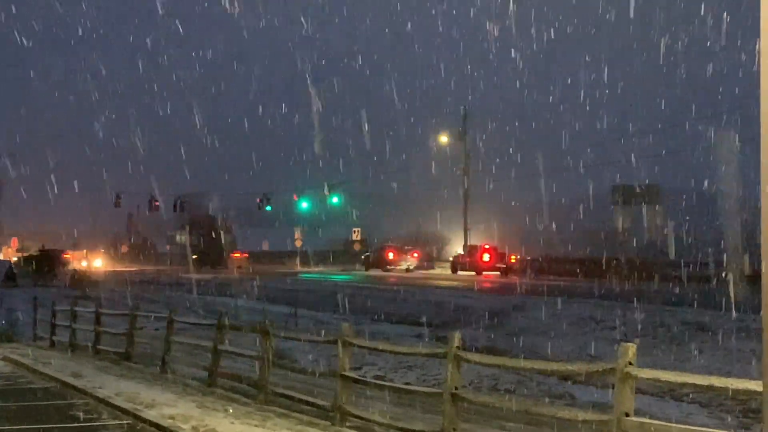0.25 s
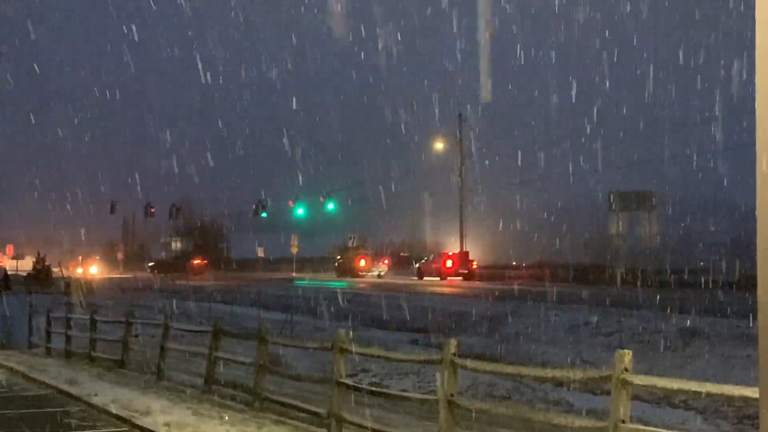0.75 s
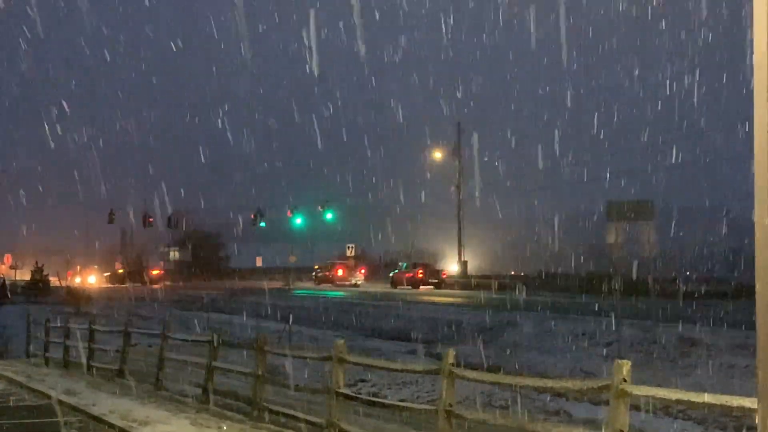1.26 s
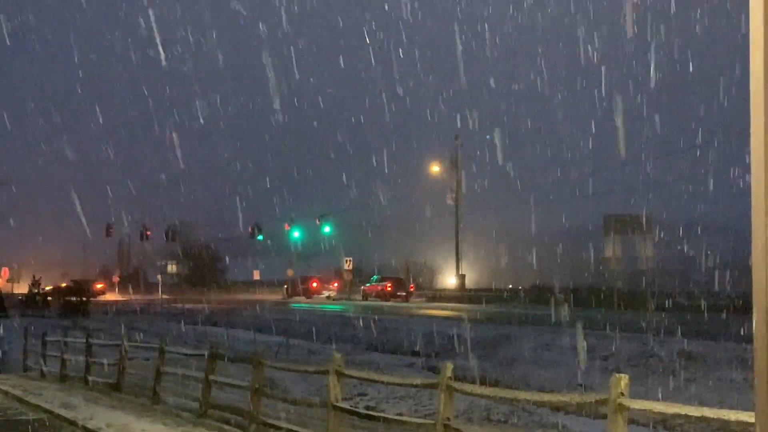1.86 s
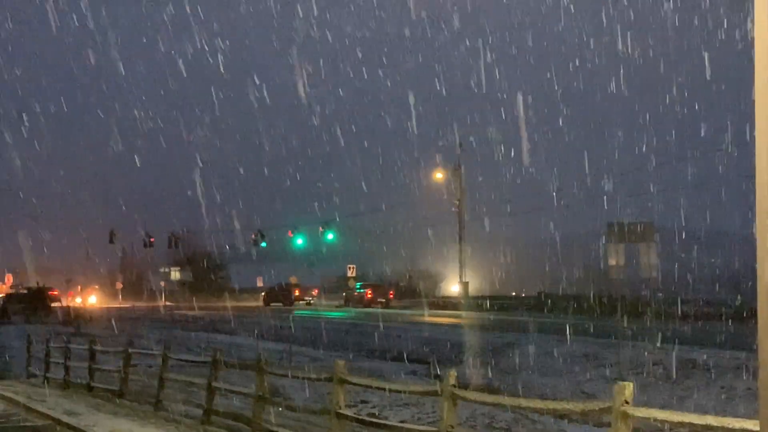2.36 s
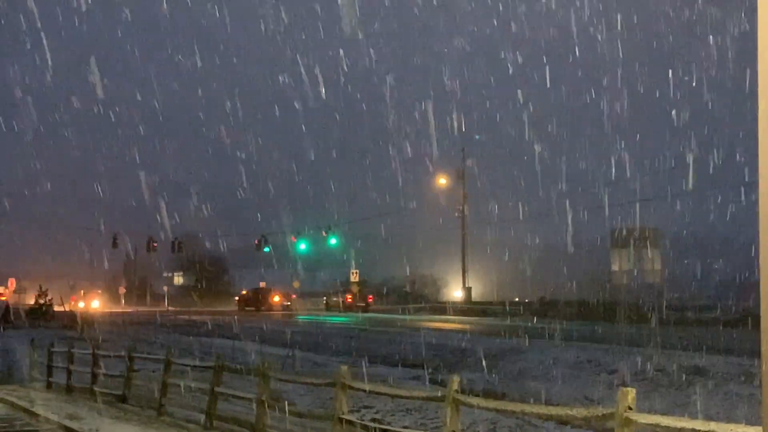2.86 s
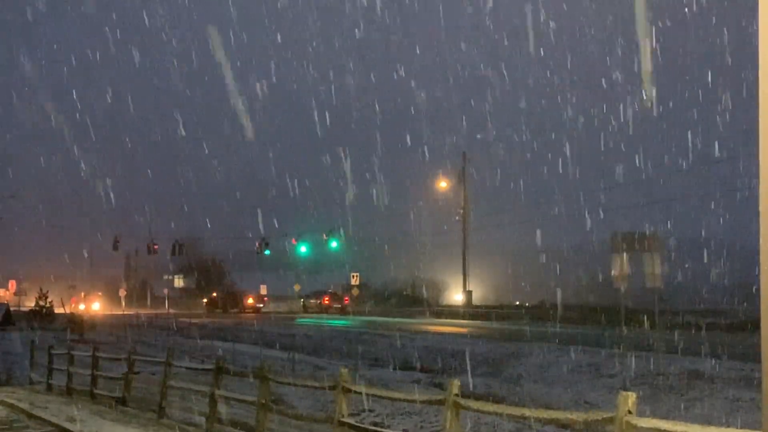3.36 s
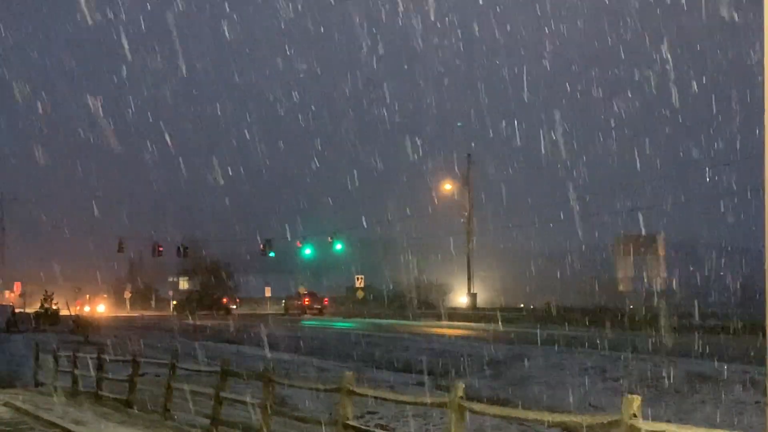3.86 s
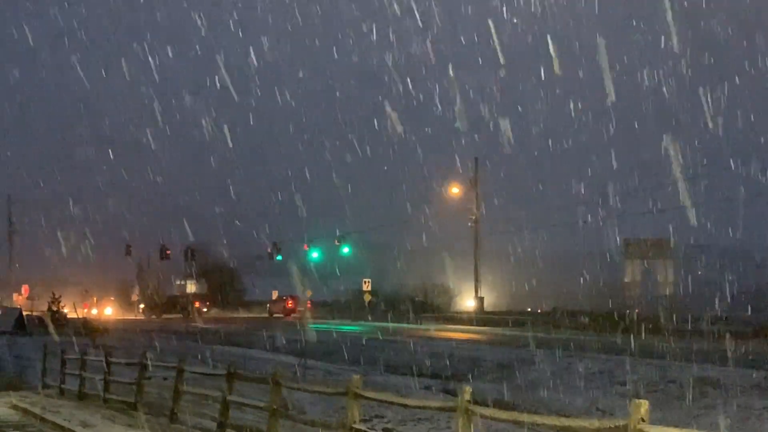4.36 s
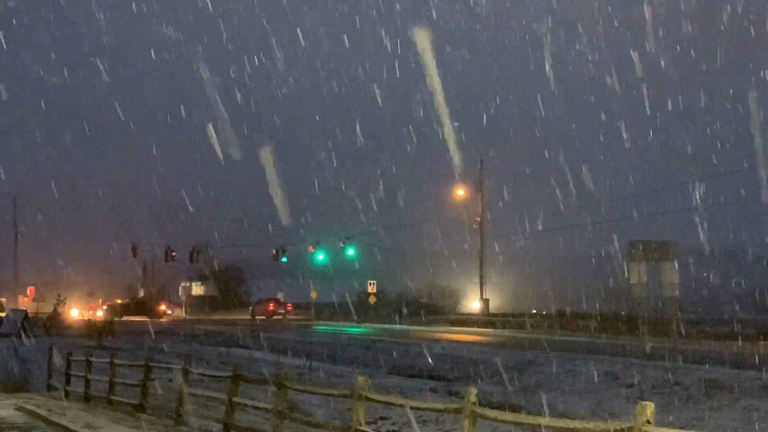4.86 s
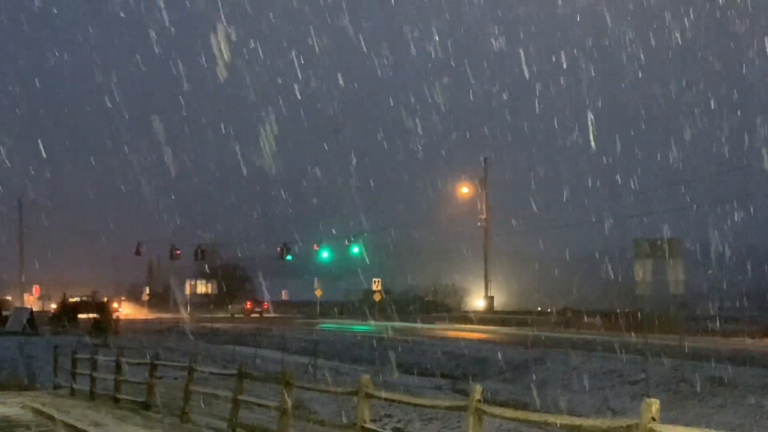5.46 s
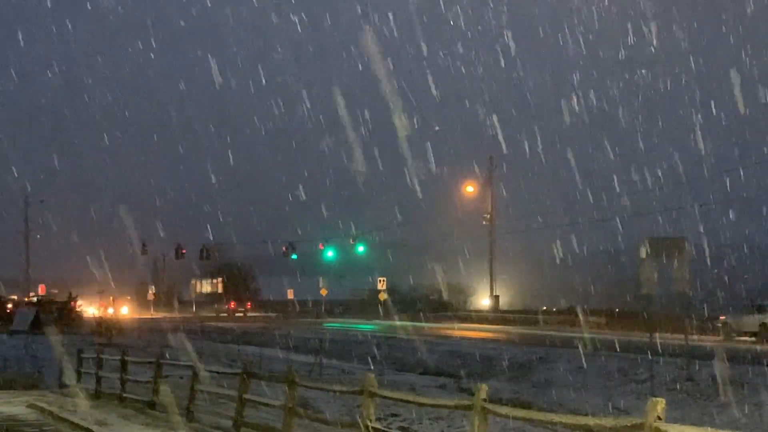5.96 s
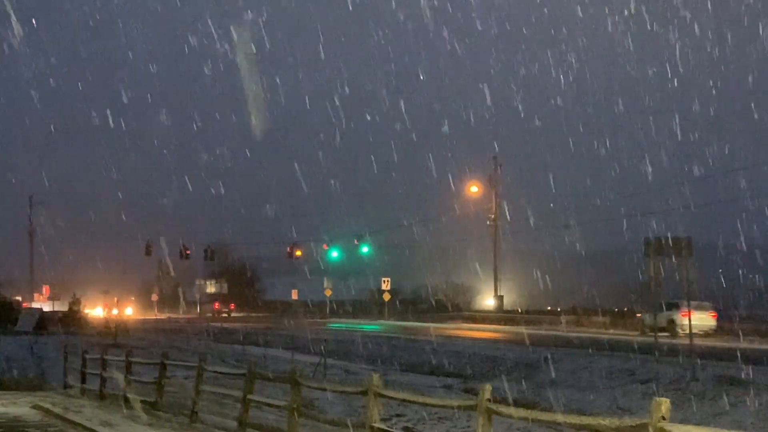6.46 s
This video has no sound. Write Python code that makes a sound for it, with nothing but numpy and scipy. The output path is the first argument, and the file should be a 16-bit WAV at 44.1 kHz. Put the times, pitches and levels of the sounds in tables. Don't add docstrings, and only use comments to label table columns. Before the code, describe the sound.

Outdoors in snowfall, a heavy truck engine drones closer over wet tyre hiss, a plow blade scrapes grittily, then a nearer vehicle swishes past.

```python
import sys
import numpy as np
from scipy import signal
from scipy.fft import rfft, irfft, next_fast_len
from scipy.io import wavfile
from scipy.ndimage import uniform_filter1d

SR = 44100
rng = np.random.default_rng(int(sys.argv[2]) if len(sys.argv) > 2 else 0)


def dump(signal):
    limited = np.clip(np.atleast_2d(signal).T, -1, 1)
    pcm = np.round(limited * 32767).astype(np.int16)
    wavfile.write(sys.argv[1], SR, pcm)


def elevation(decibels):
    levels = np.asarray(decibels, float)
    return 10 ** (levels / 20)


N = 295911
T = np.arange(N) / SR


# time in seconds, pitch of the 13th half-order in Hz, nearness in dB.
ENGINE_RUN = [(0.0, 134.6, -40), (0.5, 133.6, -41.5), (0.8, 132, -38), (1.15, 134, -40.5),
              (1.6, 135.6, -33), (2.1, 137.4, -33), (2.6, 138.6, -33.5), (3.1, 139.8, -32),
              (3.6, 140.3, -30), (4.2, 142.4, -28), (4.6, 141, -27.5), (5.2, 141.1, -27),
              (5.7, 140.5, -28.5), (6.3, 139.2, -30), (6.71, 138, -36.5)]
# half-order number, level in dB.
HALF_ORDERS = [(1, -44), (2, -42), (3, -33), (4, -9), (5, -3), (6, -27.5), (7, -16), (8, -3.5), (9, -13),
               (10, -15), (11, -14), (12, -19.5), (13, 7), (14, -13), (15, -15.5), (16, -6), (17, -9),
               (18, -14), (19, -29), (20, -13.5), (21, -11), (22, -16.5), (23, -24), (24, -34), (25, -24),
               (26, -26.5), (27, -34), (28, -26), (29, -29), (30, -23.5)]
ECHO_ORDERS = [5, 8, 13, 16, 21]
# centre in seconds, lift in dB,
# half-length in seconds.
LOW_ECHOES = [
    [(0.0, 17, 0.074), (1.3, -2, 0.18), (1.85, -7, 0.17), (2.9, -11.5, 0.14), (3.9, 1, 0.44),
     (4.36, -7.5, .08), (4.8, 3, 0.13), (5.54, 1, 0.04), (5.9, -3, 0.24)],
    [(0.3, 12, 0.25), (1.34, 6, .07), (1.51, -12, 0.042), (1.76, 9.5, .15), (2.33, 11, 0.14),
     (2.68, 9.5, .08), (3.02, 8, 0.059), (3.38, 2, 0.11), (5.2, 5, 0.059), (5.68, 8.5, 0.6),
     (6.71, 9, 0.16)],
]
# centre in seconds, lift in dB, half-length in seconds.
HIGH_ECHOES = [
    [(0.05, -5, .2), (1.01, -7, 0.19), (1.6, -4, 0.22), (2.05, -18, 0.076), (2.52, -5.5, 0.074),
     (4.1, -4.5, 0.44), (5.0, -6.5, 0.65), (5.95, -16.5, .3), (6.2, -13.5, 0.076), (6.62, -20, 0.16)],
    [(0.84, 7.5, 0.065), (1.4, 3, .15), (2.95, 5.5, 0.32), (4.15, 1.5, 0.16), (5.2, 5.5, 0.37),
     (6.35, 6, 0.077)],
    [(3.0, -2, 0.72), (3.9, 3, 0.4), (4.75, -3, 0.11), (5.1, 2.5, 0.33), (5.95, 3, 0.17), (6.6, -3, 0.26)],
]


def engine(wobble_db=4.0, wander_rad=0.17, nearing=1.55):
    s, hz, near_db = np.transpose(ENGINE_RUN)
    turn = 2 * np.pi * np.cumsum(np.interp(T, s, hz)) / 13 / SR
    coarse = T[::256]
    nearness = np.interp(coarse, s, near_db)
    swing = np.array([nearness + swells(echoes, coarse) for echoes in LOW_ECHOES + HIGH_ECHOES])
    out = np.zeros(N)
    for order, order_db in HALF_ORDERS[3:]:
        place = np.interp(order, ECHO_ORDERS, np.arange(5))
        level = sum(np.maximum(1 - abs(place - k), 0) * row for k, row in enumerate(swing))
        if order > 16:
            level += (nearing - 1) * (level - level.max())
        level += order_db
        if order not in ECHO_ORDERS:
            level += wobble_db * drift(len(coarse), 30)
        phase = rng.uniform(0, 2 * np.pi) + wander_rad * drift(len(coarse), 20)
        out += np.interp(T, coarse, elevation(level)) * np.sin(order * turn + np.interp(T, coarse, phase))
    return np.sqrt(2) * out


# time in seconds, pitch in Hz.
INTAKE_PITCH = [(0, 240), (1.5, 262.4), (2.6, 285), (3.4, 366.6), (4.8, 371), (5.3, 415.5), (6.71, 420)]
NEAR_REF_DB = -32


def intake(level_db=-50.5, follows=0.57):
    s, _, near_db = np.transpose(ENGINE_RUN)
    turn = 2 * np.pi * np.cumsum(np.interp(T, *np.transpose(INTAKE_PITCH))) / SR
    along, across = drift((2, N), 700)
    gain = elevation(level_db + follows * (np.interp(T, s, near_db) - NEAR_REF_DB))
    return gain * (along * np.sin(turn) + across * np.cos(turn))


# time in seconds, level in dB, brightness in dB.
BLADE = [
    (1.6, -44, 22),
    (2.95, -23, 22.3),
    (3.4, -19, 17.4),
    (3.75, -7, 4.8),
    (4.2, -2.5, 1.8),
    (4.85, -7, 4.2),
    (5.4, -27.5, 18.7),
    (6.0, -17, 14),
    (6.71, -18, 10),
]
# time in seconds, extra brightness in dB.
BITES = [(2.1, 6), (2.33, 2), (2.55, 0), (3.05, 0.5), (3.35, 2.5), (3.6, -0.5), (3.85, 3.5), (4.2, -2),
         (4.4, 2.5), (4.6, 1.5), (4.85, 2), (5.07, 4), (5.3, 4.5), (5.57, 12), (5.77, 4), (5.9, 1),
         (6.13, 1)]
# frequency in Hz, level in dB per third octave.
SCRAPE_COLOUR = [(200, -45), (700, -46.5), (1500, -61.5), (2500, -41.5), (4200, -47), (5500, -70.5),
                 (7500, -67), (11000, -70), (14500, -77.5)]
# time in seconds, delay of left behind right in samples.
SCRAPE_LAG = [(1.6, 17), (2.7, 18), (3.4, 15.8), (4, 12.3), (4.7, 10.2), (5.5, 13.4), (6.71, 8.25)]


def scrape(grit_db=1.3, bite_s=0.063, heap_rumble_db=-26):
    grains = rng.standard_normal((4, N)) * elevation(grit_db * drift(N, 40) - grit_db ** 2 / 9)
    bites = [(s, db, bite_s) for s, db in BITES]
    heap_full = (5.82, 16, 1.17)   # s, dB, half-length s
    rows = knots(BLADE, lambda t: heap_rumble_db + swells([heap_full], t),
                 mid_db=-4.0, mid_share=0.71, bites=bites)
    return hiss(rows, SCRAPE_COLOUR, SCRAPE_LAG, sidelong=0.2, excite=grains,
                patchy_db=0.0, gust_db=1.0, air=0.8, wall_db=6.5)


# time in seconds, level in dB, brightness in dB.
PASSING = [
    (4.52, -14, 5.5),
    (4.96, -12, 10.5),
    (5.2, -13, 14),
    (5.5, -7.5, 7),
    (5.83, -3.5, -0.4),
    (6.3, 0, -5),
    (6.71, -1.5, -7.5),
]
# frequency in Hz, level in dB per third octave.
PASSING_COLOUR = [(100, -80), (250, -44.5), (480, -51.5), (620, -45.5), (720, -41.5), (830, -41.5),
                  (1000, -50), (1500, -45.5), (2500, -45), (4200, -49), (5500, -59.5), (7500, -58.5),
                  (11000, -62.5), (14500, -63.5)]
# time in seconds, delay of left behind right in samples.
PASSING_LAG = [(4.5, 22.1), (5, 18), (5.3, 15.6), (5.7, 13.4), (6, 11), (6.71, 8.6)]


def passing(rumble_db=-10):
    closest = (5.65, 13.4, 0.65)   # s, dB, half-length s
    rows = knots(PASSING, lambda t: rumble_db + swells([closest], t), mid_db=3.5, mid_share=0.43)
    return hiss(rows, PASSING_COLOUR, PASSING_LAG, sidelong=0.05, excite=rng.standard_normal((4, N)),
                patchy_db=1.0, gust_db=0.43, air=0.41, wall_db=0.0)


def exhaust_tone(rows, echoes=()):
    s, hz, level_db = np.transpose(rows)
    since_start = T - s[0] + 0.13 * (s[0] == 0)
    until_end = s[-1] - T + 0.1 * (s[-1] > 6.7)
    fade = np.clip(np.minimum(since_start, until_end) / 0.18, 0, 1)
    gain = elevation(np.interp(T, s, level_db) + swells(echoes, T))
    return np.sqrt(2) * fade * gain * np.sin(2 * np.pi * np.cumsum(np.interp(T, s, hz)) / SR)


# time in seconds, pitch in Hz, level in dB rms.
LEAVING = [(0.0, 109.9, -33.5), (0.14, 107.4, -29), (0.29, 108.7, -28.5), (0.43, 109.2, -30.5),
           (0.57, 116.7, -32), (0.71, 119.6, -51), (0.86, 115.4, -32), (1.0, 123, -27)]
# time in seconds, pitch in Hz, level in dB rms.
CLIMBING = [(0.9, 75.5, -30), (1.15, 74.8, -34), (1.4, 80, -43), (2.12, 85.2, -32), (2.3, 87.3, -33),
            (3.7, 98.3, -23.5), (4.5, 105, -26), (4.79, 97.4, -26.5), (5.0, 84, -38)]
# centre in seconds, lift in dB, half-length in seconds.
CLIMBING_ECHOES = [
    (2.596, -14, 0.091),
    (3.25, -4, 0.22),
    (4.1, -8, 0.18),
    (4.477, -4, 0.11),
]
# time in seconds, pitch in Hz, level in dB rms.
BOOMS = [
    [(1.2, 61.2, -52), (1.35, 57.4, -42), (1.5, 55, -25), (1.65, 58.5, -64), (1.8, 58.1, -45)],
    [(2.5, 54.1, -41), (2.74, 60.05, -26.5), (2.99, 62.7, -22), (3.23, 59.2, -31), (3.36, 55.3, -31),
     (3.48, 54, -22), (3.6, 53.88, -35)],
]
# time in seconds, pitch in Hz, level in dB rms.
DRONES = [
    [(0.0, 96, -51), (0.25, 97.3, -53), (0.6, 100.1, -32), (0.8, 104.2, -47.5), (1.4, 109.4, -28),
     (1.6, 105, -38)],
    [(1.5, 111.6, -33), (2.1, 115.9, -36), (3, 118.6, -29), (4.7, 121, -34), (5.8, 118.5, -38.5),
     (6.71, 117.6, -34)],
]
# centre in seconds, lift in dB, half-length in seconds.
DRONE_ECHOES = [
    (3.8, 1, 0.41),
    (5.15, -15, 0.17),
    (6.4, -6, 0.19),
]


def other_engines():
    out = sum(exhaust_tone(rows) for rows in [LEAVING, *BOOMS, DRONES[0]])
    out += exhaust_tone(CLIMBING, CLIMBING_ECHOES)
    return out + exhaust_tone(DRONES[1], DRONE_ECHOES)


# time in seconds, level in dB, brightness in dB.
ROAD = [(0.0, 1, -5), (0.6, -1, -2), (1.2, -3, 0.5), (1.7, -2.5, 1.5), (2.24, -2, 2), (2.7, 0.5, -2),
        (3.1, 0.8, -1), (3.7, 0, 0), (4.3, -3, 2), (4.8, -0.5, -7.5), (5.5, 1.5, -13.5), (6.0, 0.5, -17),
        (6.71, -10, -5.5)]
# frequency in Hz, level in dB per third octave.
TRAFFIC_COLOUR = [(30, -68.5), (50, -51), (110, -33), (220, -50.5), (330, -50), (470, -51), (750, -44),
                  (1400, -45.5), (2200, -55.5), (4200, -50), (5500, -57), (7500, -65.5), (10000, -68),
                  (14500, -83)]
# time in seconds, delay of left behind right in samples.
TRAFFIC_LAG = [(0, 19.1), (.4, 19.7), (.8, 19.35), (1.5, 20.3), (2.3, 20.2), (3.2, 19), (4, 21.3),
               (4.6, 19.9), (5.2, 17.3), (6.71, 18.7)]


def traffic(rumble_follows=0.76):
    s, _, near_db = np.transpose(ENGINE_RUN)
    rows = knots(ROAD, lambda t: rumble_follows * (np.interp(t, s, near_db) - NEAR_REF_DB),
                 mid_db=2.5, mid_share=1.0)
    return hiss(rows, TRAFFIC_COLOUR, TRAFFIC_LAG, sidelong=0.89, excite=rng.standard_normal((4, N)),
                patchy_db=0.97, gust_db=0.47, air=12.6, wall_db=-0.5)


def at_hz(points, hz):
    table_hz, value = np.array(points).T
    return np.interp(np.log(hz + 1), np.log(table_hz), value)


def drift(shape, steps):
    slow = uniform_filter1d(uniform_filter1d(rng.standard_normal(shape), steps), steps)
    return slow / slow.std()


def swells(events, s):
    return sum(db * np.exp(-((s - at) / half) ** 2) for at, db, half in events) + 0 * s


def knots(rows, rumble_db, mid_db, mid_share, bites=()):
    s = np.arange(rows[0][0], T[-1], 0.02)
    at, level, bright = np.transpose(rows)
    level = np.interp(s, at, level)
    bright = np.interp(s, at, bright) + swells(bites, s)
    return np.transpose([s, rumble_db(s), level, level + mid_db + mid_share * bright, level + bright])


KNOTS_HZ = [320, 900, 3000, 10000]
# frequency in Hz, angle in radians.
PORT_TURN = [(250, -0.075), (550, 1.88), (1000, 0.42), (2500, 0.19), (4500, -0.89), (5500, -0.62),
             (6500, -1.7), (8200, -2)]
# frequency in Hz, level in dB.
WALL = [(200, -17.5), (450, -2.5), (900, -21), (3000, -12.5), (4800, -9), (5600, 0), (7500, 0), (9000, -1)]
WALL_LAG = -21.5
# frequency in Hz, level in dB.
SCATTER = [(60, -11), (150, -4.5), (400, -5), (1000, -7), (3000, -11.5), (6000, -17.5), (9000, -6.5)]
# frequency in Hz, difference in dB.
RIGHT_PORT_SIDE = [(150, 0.5), (500, -6), (750, 2), (1900, 1.5), (3200, 1.5), (4800, -1), (7950, 1),
                   (8050, 15), (9400, 7)]
# frequency in Hz, difference in dB.
RIGHT_PORT_FRONT = [(150, -2), (500, -1.5), (750, 8.5), (1400, 2), (2500, -0.5), (5000, 4.5), (7950, 0.5),
                    (8050, 7), (9400, 3.5)]


def hiss(rows, colour, lags, sidelong, excite, patchy_db, gust_db, air, wall_db):
    hz, s, (direct, thrown, *around) = signal.stft(excite, SR, nperseg=512)
    rows = np.array(rows)
    onset_db = 60 * np.minimum(s - rows[0, 0], 0)
    loud = np.array([np.interp(s, rows[:, 0], c) + onset_db for c in rows.T[1:]])
    place = np.interp(np.log(hz + 1), np.log(KNOTS_HZ), np.arange(4))
    dulling = air * np.outer(np.log2(np.maximum(hz / 8500, 1)), loud[3])
    loud = np.array([np.interp(place, np.arange(4), frame) for frame in loud.T]).T + dulling
    patches = uniform_filter1d(drift(direct.shape, 12), 16, axis=0) * 4
    gusts = drift(len(s), 5) * np.clip(place - 1, 0, 2)[:, None]
    per_bin_db = at_hz(colour, hz) - 10 * np.log10(0.46 * (hz + 1) / SR)
    gain = elevation(per_bin_db[:, None] + loud + patchy_db * patches + gust_db * gusts)

    w = np.pi * hz[:, None] / SR
    half = w * np.interp(s, *np.transpose(lags)) + sidelong * at_hz(PORT_TURN, hz)[:, None] / 2
    thrown = thrown * elevation(at_hz(WALL, hz) + wall_db)[:, None]
    left = direct * np.exp(-1j * half) + thrown * np.exp(-1j * w * WALL_LAG)
    right = direct * np.exp(1j * half) + thrown * np.exp(1j * w * WALL_LAG)
    both = np.array([left, right]) + np.array(around) * elevation(at_hz(SCATTER, hz))[:, None]
    lean_db = sidelong * at_hz(RIGHT_PORT_SIDE, hz) + (1 - sidelong) * at_hz(RIGHT_PORT_FRONT, hz)
    both[1] *= elevation(lean_db)[:, None]
    return signal.istft(gain * both, SR, nperseg=512)[1][:, :N]


def two_ports(x, lag):
    n = np.arange(N)
    return np.array([np.interp(n - lag / 2, n, x), np.interp(n + lag / 2, n, x)])


# time in seconds, left over right in dB.
SWAY = [(0.0, 0), (0.37, -2), (0.95, 3), (1.83, 1), (2.22, 0.5), (2.52, 2.5), (3.18, 4), (4.71, 1),
        (5.0, -0.5), (6.71, 0.3)]


def scene():
    lag = np.interp(T, *np.transpose(TRAFFIC_LAG))
    sway = elevation(np.interp(T, *np.transpose(SWAY)) / 2 * np.array([[1], [-1]]))
    heavy = sway * two_ports(engine() + intake(), 1.31 * lag)
    others = two_ports(other_engines(), 0.58 * lag)
    return heavy + others + traffic() + passing() + scrape()


def thin_weaker(pair, under_db=13.5, from_hz=3000):
    hz, s, parts = signal.stft([pair[0] + pair[1], pair[0] - pair[1]], SR, nperseg=1024)
    power = uniform_filter1d(uniform_filter1d(abs(parts) ** 2, size=9, axis=1), size=5, axis=2)
    kept = (power > power[::-1] * elevation(-2 * under_db)) | (hz < from_hz)[:, None]
    mid, side = signal.istft(parts * kept, SR, nperseg=1024)[1][:, :N] / 2
    return np.array([mid + side, mid - side])


def top_cut(x):
    return signal.sosfilt(signal.butter(12, 15140, fs=SR, output="sos"), x)


# low edge in Hz, high edge in Hz,
# sign (+1 alike in both channels, -1 opposed).
JOINT_BANDS = [(9650, 11200, 1), (11200, 12350, -1), (12350, 14250, 1), (14250, 22050, -1)]


def record(dry, self_noise_db=-76, self_noise_hz=9000):
    size = next_fast_len(N)
    hz = np.fft.rfftfreq(size, 1 / SR)
    left, right = rfft(dry, size) / (1 + (41.0 / (hz + 1)) ** 27.0)
    for low, high, sign in JOINT_BANDS:
        right = np.where((hz >= low) & (hz < high), sign * left, right)
    own = elevation(self_noise_db) * rfft(rng.standard_normal(dry.shape), size) * (hz > self_noise_hz)
    mix = irfft(np.array([left, right]) + own, size)[:, :N]
    return top_cut(thin_weaker(mix))


dry = scene()
out = record(dry)
dump(out)
```